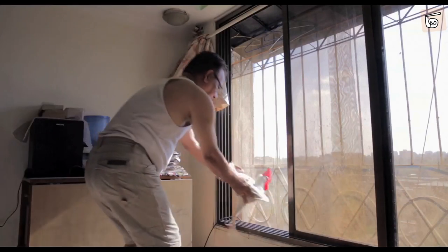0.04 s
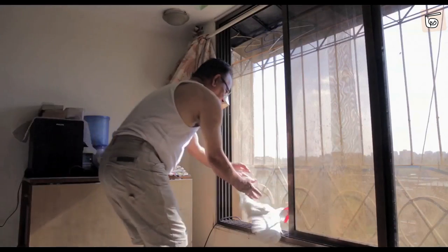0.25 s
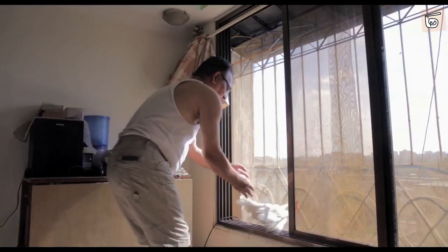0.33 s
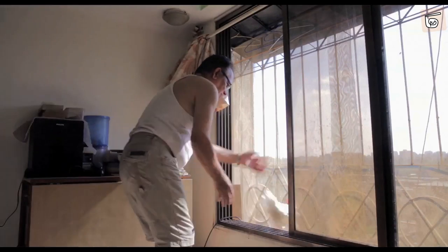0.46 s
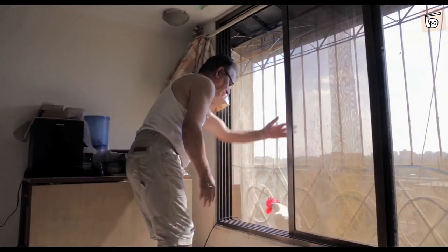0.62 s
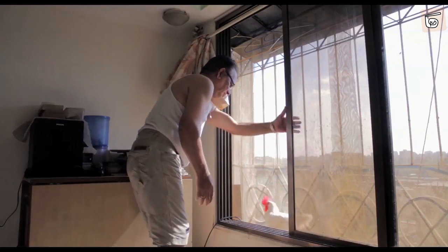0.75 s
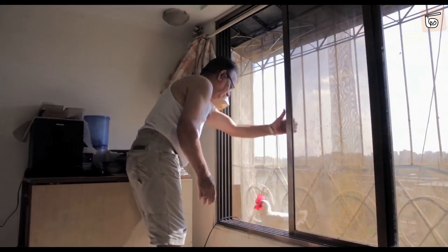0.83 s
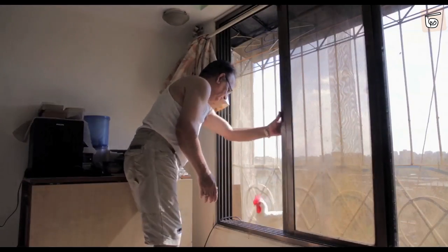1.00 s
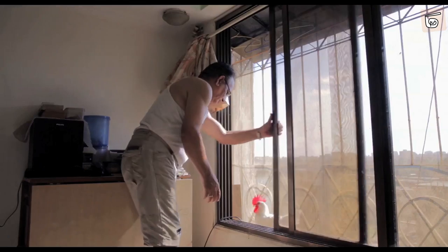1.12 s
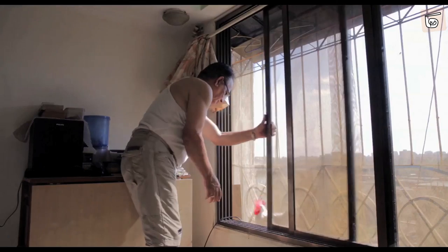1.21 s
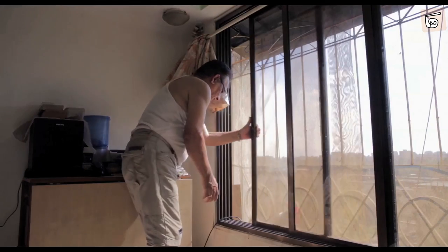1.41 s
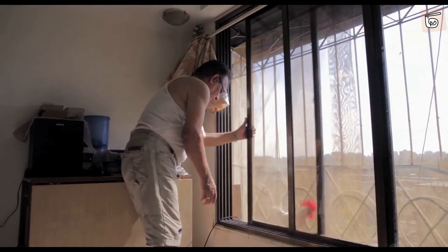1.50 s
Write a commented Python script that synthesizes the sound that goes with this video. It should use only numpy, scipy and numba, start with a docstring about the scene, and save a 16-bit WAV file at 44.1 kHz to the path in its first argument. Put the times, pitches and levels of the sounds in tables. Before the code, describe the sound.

A rooster, close in a bare room, clucks softly twice from 0.05 s, then squawks harshly and nasally at 0.2-0.35 and 0.45-0.68 s. A dull thump falls at 0.24; claws tick and knock the metal sill around 0.37-0.41. Short clucks follow at 0.77, 0.93 and 1.13, a weaker one at 1.45. From 1.2 a sliding pane faintly rumbles and groans. Low street hum throughout, short dense echo.

```python
"""A bare room, at the window ledge: a rooster set down near the microphone clucks softly, squawks harshly twice,
then gives short clucks. Its voice is uneven pulses and breath through throat and beak resonances.
Its claws knock and tick on the metal sill: struck modes and short noise bursts, with one dull thump.
A sliding pane starts to rumble shut: coloured noise under a moving level, with groans of its frame.
The street hums beneath, as steady noise; a short, dense echo answers the near sounds."""
import sys
import numpy as np
from scipy import signal
from scipy.fft import rfft, irfft
from scipy.io import wavfile
from scipy.ndimage import uniform_filter1d
from numba import njit

SR = 44100
rng = np.random.default_rng(int(sys.argv[2]) if len(sys.argv) > 2 else 0)


def store_wav(level_fs):
    """Save 16-bit WAV to argv[1]."""
    pcm = np.round(np.clip(np.atleast_2d(level_fs), -1, 1) * 32767)
    wavfile.write(sys.argv[1], SR, pcm.T.astype(np.int16))


N = 68355


def undb(db):
    """Decibels to amplitude."""
    return 10 ** (np.asarray(db, float) / 20)


def unit(x):
    """Scale to an RMS of 1."""
    return x / np.sqrt(np.mean(x ** 2))


def slow(size):
    """Random drift that turns about every size samples; spread 1."""
    smooth = uniform_filter1d(rng.standard_normal(N), size)
    return unit(uniform_filter1d(smooth, size))


@njit
def svf(x, hz, width):
    """Band-pass whose centre may move, gain 1 at the centre."""
    y, b, l = np.empty(len(x)), 0., 0.
    for i in range(len(x)):
        g, k = np.tan(np.pi * hz[i] / SR), width / hz[i]
        v = (b + g * (x[i] - l)) / (1 + g * (g + k))
        b, l, y[i] = 2 * v - b, l + 2 * g * v, k * v
    return y


def band(x, hz, width_hz):
    """Band-pass at a fixed or moving centre."""
    return svf(x, hz + np.zeros(N), float(width_hz))


def coloured(points):
    """Noise of RMS 1 whose spectrum follows (f/Hz, level/dB) points."""
    hz, db = np.array(points, float).T
    f = np.maximum(np.fft.rfftfreq(N, 1 / SR), 1)
    shape = undb(np.interp(np.log(f), np.log(hz), db))
    return unit(irfft(rfft(rng.standard_normal(N)) * shape, N))


def ring(t, hz, t60):
    """A struck mode, t in s since the blow; it loses 60 dB in t60 s."""
    t = np.maximum(t, 0)
    return np.sin(2 * np.pi * hz * t) * np.exp(-np.log(1000) * t / t60)


# spectrum of the street: (f/Hz, relative level/dB per Hz)
STREET_SPECTRUM = [(12, -55), (20, -2), (459, -1), (574, -10), (1330, -6.5), (1570, -12), (2750, -12),
                   (14300, -38.5), ]
STREET_DB = -53.5
HUM_HZ, HUM_WIDTH_HZ, HUM_DB = 62.5, 12, -64.5
WIDE_DB, WIDE_HZ = -8, 130  # left-right difference relative to the street, and its low-pass corner
BASS_LEFT_DB = 1.5  # lean of the bass to the left


def street():
    """Steady coloured noise and a narrow hum; only the bass differs between left and right."""
    hum = unit(band(rng.standard_normal(N), HUM_HZ, HUM_WIDTH_HZ)) * undb(HUM_DB)
    middle = coloured(STREET_SPECTRUM) * undb(STREET_DB) + hum
    spread = coloured(STREET_SPECTRUM) * undb(STREET_DB + WIDE_DB)
    lean = middle * (undb(BASS_LEFT_DB / 2) - 1)
    side = signal.lfilter(*signal.butter(1, WIDE_HZ, fs=SR), spread + lean)
    return middle + side * np.array([[1], [-1]])


@njit
def syrinx(hz, jitter, shimmer, alternate, limp, chance):
    """One pulse a cycle, each with its own length and size, split over two samples."""
    pulses, phase, p, k = np.zeros(len(hz) + 1), np.empty(len(hz)), 0., 0
    for i in range(len(hz)):
        uneven = jitter[i] * chance[k, 0] + limp * alternate[i] * (1 - 2 * (k % 2))
        step = hz[i] * np.exp(uneven) / SR
        p += step
        if p >= 1:
            p, k = p - 1, k + 1
            weak = 1 - alternate[i] * (k % 2)
            size = np.exp(shimmer[i] * chance[k, 1]) * weak * np.sqrt(SR / hz[i])
            pulses[i] += size * p / step
            pulses[i + 1] += size * (1 - p / step)
        phase[i] = p
    return pulses[:-1], phase


# calls, one list each: rows (t/s, pitch f/Hz, level/dB, first throat resonance f/Hz,
# brightness level/dB, chest level/dB); the last two relative to the throat
SQUAWK_CALLS = [
    [(0.18, 514.6, -50.5, 1150, -7.5, 7.5), (0.206, 565.8, -39.5, 1400, 1, -4.5),
     (0.23, 641.6, -24.5, 1265, -5.5, -5), (0.268, 701.3, -30, 1390, 1, -5.5),
     (0.286, 630.7, -21, 1315, -8.5, -10), (0.316, 605.6, -29, 1200, -6.5, -8.5),
     (0.355, 636.6, -46.5, 1295, -2.5, 2)],
    [(0.45, 563, -50, 1130, -8, 0), (0.468, 584.3, -23.5, 1136, -10, -10.5),
     (0.488, 583, -29.5, 1110, -1, -9), (0.52, 755.7, -28, 1370, 1, -7), (0.55, 584, -26.5, 1178, 0.5, -11),
     (0.585, 675, -26.5, 1110, 1.5, -27), (0.625, 664.6, -22.5, 1279, -8.5, -13),
     (0.648, 633, -20.5, 1250, -7, -15), (0.685, 635, -41.5, 1389, -1.5, -3)],
]
CLUCK_CALLS = [
    [(0.047, 389.5, -98, 1120, 16, -8), (0.053, 386.7, -35.5, 970, -16.5, -10),
     (0.081, 376.7, -43.5, 1100, -21.5, -34), (0.105, 388, -36.5, 1030, -10, -29),
     (0.11, 383, -71, 1120, -22, -12)],
    [(0.11, 352, -53, 1070, 11, -7), (0.118, 336, -45.5, 1060, -7, 7.5), (0.142, 350.2, -45, 1280, -11, -7),
     (0.15, 596, -40, 1220, -31, -26), (0.16, 607.8, -41.5, 1300, -19, -19),
     (0.18, 618.6, -53, 1300, -14, -20)],
    [(0.76, 523, -35, 1283, -6.5, -4), (0.772, 610.5, -34.5, 1323, -0.5, 1.5),
     (0.782, 656.2, -26, 1306, -4.5, -8.5), (0.8, 700.4, -28.5, 1274, -0.5, -6),
     (0.812, 803.5, -29.5, 1290, -2, -5.5), (0.83, 787.7, -42, 1430, 0, -6)],
    [(0.92, 580.4, -74, 1036, -27, -10), (0.924, 579.6, -37, 1004, -6.5, -16),
     (0.934, 559.6, -22, 934, -20, -12), (0.948, 619, -34, 1030, 3.5, -5.5),
     (0.964, 610.7, -30.5, 1060, -0.5, -11), (0.99, 600, -38, 1168, -48, -10)],
    [(1.11, 489, -67.5, 1134, 6, -5), (1.122, 502, -35.5, 1109, -2.5, 1.5),
     (1.136, 573, -26, 1126, -10, -29), (1.148, 598, -30.5, 1166, -5, -8),
     (1.165, 517, -30.5, 970, -27, -28), (1.21, 596, -84, 1103, 24, -13)],
]
FINAL_CLUCK = [(1.44, 484, -48, 1200, -1.5, -2.5), (1.466, 486.5, -34.5, 1160, -13.5, -9.5),
               (1.476, 473.8, -83, 1250, -21, -4)]
# unevenness of the pulses: (t/s, roughness 0-1, strong-weak alternation 0-1)
VOICE_TEXTURE = [(.05, .35, .1), (.155, .25, 0), (.21, .2, .1), (.225, .22, .5), (.27, .4, .55),
                 (.29, .18, .35), (.35, .35, .2), (.45, .7, .4), (.54, .6, .4), (.6, .45, .3),
                 (.63, .12, 0), (.76, .5, .3), (.775, .04, 0), (.795, .04, 0), (.803, .7, .3),
                 (.92, .6, .7), (.945, .1, .2), (.965, .12, .2), (.98, .5, .7), (1.11, .2, .9),
                 (1.122, .2, .8), (1.13, .12, .1), (1.17, .35, .2), (1.44, .06, .9)]
# upper throat and beak resonances: (squawk f/Hz, squawk level/dB, cluck f/Hz, cluck level/dB),
# levels relative to each other
BEAK_RESONANCES = [(1767, 8.5, 1840, 2), (2214, 6, 2064, -4), (2683, 8.5, 2670, 5), (3253, 1.5, 3465, 5.5),
                   (3930, -3, 4310, -1.5), (5194, -5, 5940, -7.5), (6690, -12.5, 7540, -12.5)]
# broad treble of the voice, relative to the beak resonances: (f/Hz, level/dB)
TREBLE_BANDS = [(8500, -20.5), (12500, -67)]
# a second, weaker membrane humming under the long squawk: (t/s, f/Hz, level/dB)
SECOND_MEMBRANE = [(0.491, 660.2, -47), (.522, 757.8, -36), (.612, 740.4, -33.5), (0.651, 615, -38)]
WANDER, JITTER, SHIMMER_DB = .06, .13, 4  # spread of pitch drift, pulse length and size at full roughness
BREATH_GAIN = 1.2619  # at full roughness
LIMP = .12  # weak pulses come early by about this share of a cycle at full alternation
BEAT = .35  # depth to which the second membrane beats against the first
LOW_HZ, LOW_WIDTH_HZ, THROAT_WIDTH_HZ = 816, 500, 376  # widths of the first of two passes
BEAK_Q, THROAT_REST_HZ = 15, 1270  # Q of the first pass at this frequency; less above it
BEAK_WANDER, PATCHY_DB = .03, 2  # spread of resonance (and second pitch) drift; flicker of resonances


def rooster(t):
    """Uneven pulses and breath, dying over each cycle, through a moving throat and a beak."""
    calls = sorted(SQUAWK_CALLS + CLUCK_CALLS + [FINAL_CLUCK])
    during = lambda some: sum((t >= call[0][0]) & (t <= call[-1][0]) for call in some) > 0
    rows = np.array([row for call in calls for row in call], float)
    hz, db, throat_hz, bright, chest = (np.interp(t, rows[:, 0], column) for column in rows.T[1:])
    texture_s, *texture = np.array(VOICE_TEXTURE).T
    rough, alternate = (np.interp(t, texture_s, column) for column in texture)

    pitch = hz * np.exp(WANDER * rough * slow(size=300))
    shimmer = SHIMMER_DB * np.log(10) / 20 * rough
    chance = rng.standard_normal((N // 20, 2))
    pulses, phase = syrinx(pitch, JITTER * rough, shimmer, alternate, LIMP, chance)
    breath = BREATH_GAIN * rough * np.exp(-phase) * rng.standard_normal(N)

    s, second_hz, second_db = np.array(SECOND_MEMBRANE, float).T
    second_pitch = np.interp(t, s, second_hz) * np.exp(BEAK_WANDER * slow(size=150))
    second = np.sin(2 * np.pi * np.cumsum(second_pitch) / SR)
    beating = (t > s[0]) * (t < s[2])
    source = (pulses + breath) * (1 + BEAT * second * beating)

    twice = lambda f, width: band(band(source, f, width), f, 2 * width)
    open_beak = during(SQUAWK_CALLS)
    high = np.zeros(N)
    # neighbouring resonances alternate in sign
    for k, (f, level, cluck_f, cluck_level) in enumerate(BEAK_RESONANCES):
        centre = np.where(open_beak, f, cluck_f) * np.exp(BEAK_WANDER * slow(size=500))
        gain = undb(np.where(open_beak, level, cluck_level) + PATCHY_DB * slow(size=250))
        width = f / BEAK_Q * (f / THROAT_REST_HZ) ** .5
        high += (-1) ** k * gain * twice(centre, width)
    for k, (f, level) in enumerate(TREBLE_BANDS):
        high -= (-1) ** k * undb(level + PATCHY_DB * slow(size=120)) * twice(f, f / 2)

    throat = unit(twice(throat_hz, THROAT_WIDTH_HZ))
    low = unit(twice(LOW_HZ, LOW_WIDTH_HZ)) * undb(chest)
    voice = throat - low - unit(high) * undb(bright)
    voice = signal.sosfilt(signal.butter(4, 500, "high", fs=SR, output="sos"), voice)
    gate = uniform_filter1d(during(calls) * 1., size=100)
    hum_db = np.interp(t, s, second_db, left=-99, right=-99) + SHIMMER_DB * slow(size=150)
    return voice * undb(db) * gate + second * undb(hum_db)


# claw knocks on the sill: (t/s, level/dB, crack level/dB relative to the knock)
CLAW_KNOCKS = [(0.386, -25, -11), (0.408, -22, -19.5)]
# ringing modes of the metal sill: (f/Hz, level/dB relative to the knock, t60/s)
SILL_MODES = [(1280, 3, 0.015), (1788, 1.5, 0.004), (3790, -7, 0.013)]
# thin claw ticks: (t/s, level/dB)
CLAW_TICKS = [(0.05, -53), (0.367, -35.5), (0.3708, -36), (1.2395, -56), (1.3383, -52.5), (1.3656, -51)]
TICK_HZ, TICK_WIDTH_HZ, TICK_S = 7900, 4100, 0.0011  # TICK_S: fall to 1/e
CRACK_S, KNOCK_RISE_S = 0.0066, 0.00015  # time constants
THUMP_S, THUMP_HZ, THUMP_DB, THUMP_T60_S = .243, 175, -36.5, 0.066


def claws(t):
    """Knocks crack and ring the sill; ticks are bursts of treble; one dull thump is a damped mode."""
    out = undb(THUMP_DB) * ring(t - THUMP_S, THUMP_HZ, THUMP_T60_S)
    puff = lambda s, fall_s: (t > s) * np.exp(-np.maximum(t - s, 0) / fall_s)
    crack = unit(band(band(rng.standard_normal(N), 3200, 7200), 3800, 11000))
    for s, db, crack_db in CLAW_KNOCKS:
        ringing = sum(undb(level) * ring(t - s, f, t60) for f, level, t60 in SILL_MODES)
        cracking = undb(crack_db) * crack * puff(s, CRACK_S)
        out = out + undb(db) * (1 - puff(s, KNOCK_RISE_S)) * (ringing + cracking)
    burst = sum(undb(db) * puff(s, TICK_S) for s, db in CLAW_TICKS)
    return out + burst * unit(band(rng.standard_normal(N), TICK_HZ, TICK_WIDTH_HZ))


# rumble of the sliding pane: (t/s, level/dB)
PANE_SLIDE = [(1.16, -59.5), (1.352, -54), (1.39, -61.5), (1.417, -50.5), (1.55, -50.5)]
# spectrum of the rail: (f/Hz, relative level/dB per Hz)
RAIL_SPECTRUM = [(100, -56), (140, -15), (407, -16), (1020, -14), (1140, -14.5), (15000, -48)]
# groans of the frame: (start t/s, peak level/dB)
FRAME_GROANS = [(1.214, -48), (1.299, -52.5), (1.479, -49)]
GROAN_HZ, GROAN_RISE_S = 420, 0.014


def pane(t):
    """The pane rumbles along its rail as coloured noise and its frame groans as a swelling tone."""
    s, db = np.array(PANE_SLIDE, float).T
    swell = lambda u: np.e * u * np.exp(-u)  # peaks at 1 when u is 1
    swells = sum(undb(d) * swell(np.maximum(t - at, 0) / GROAN_RISE_S) for at, d in FRAME_GROANS)
    groan = swells * np.sin(2 * np.pi * GROAN_HZ * t)
    return coloured(RAIL_SPECTRUM) * undb(np.interp(t, s, db, left=-90)) + groan


ROOM_T60_S, ROOM_DB, ROOM_DULL_HZ = 0.17, -10, 4100  # T60 of the part below ROOM_DULL_HZ


def room(x):
    """A dense noise tail, starting after 3 ms, whose treble dies twice as fast."""
    t = np.arange(SR // 2) / SR
    noise = rng.standard_normal(len(t))
    dull = signal.lfilter(*signal.butter(1, ROOM_DULL_HZ, fs=SR), noise)
    fall = np.exp(-np.log(1000) * t / ROOM_T60_S)
    tail = (dull * fall + (noise - dull) * fall ** 2) * (t > .003)
    return signal.fftconvolve(x, tail / np.sqrt(np.sum(tail ** 2)))[:N] * undb(ROOM_DB)


def scene():
    """Rooster, claws and pane near the microphone, with their echo, over the stereo street."""
    t = np.arange(N) / SR
    near = rooster(t) + claws(t) + pane(t)
    return near + room(near) + street()


TOP_HZ = 15900


def record(dry):
    """The camera cuts the top: a steep low-pass."""
    return signal.sosfilt(signal.ellip(10, .2, 80, TOP_HZ, fs=SR, output="sos"), dry)


dry = scene()
out = record(dry)
store_wav(out)
```